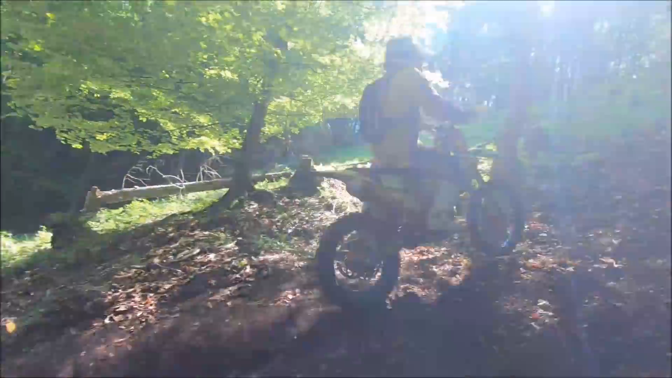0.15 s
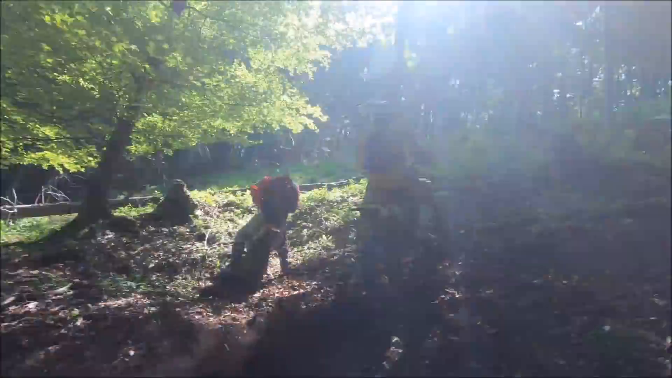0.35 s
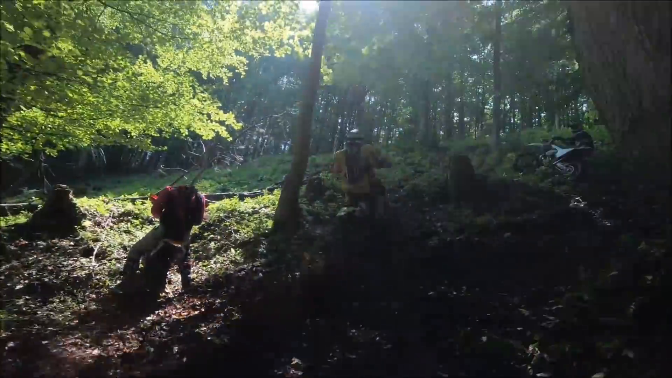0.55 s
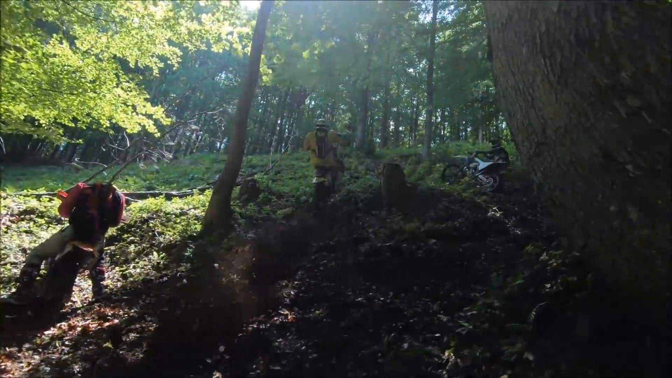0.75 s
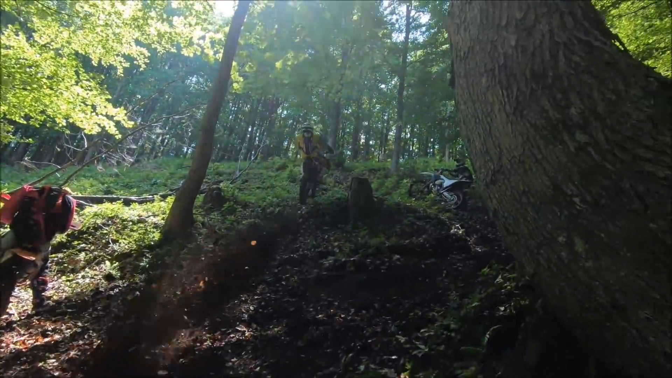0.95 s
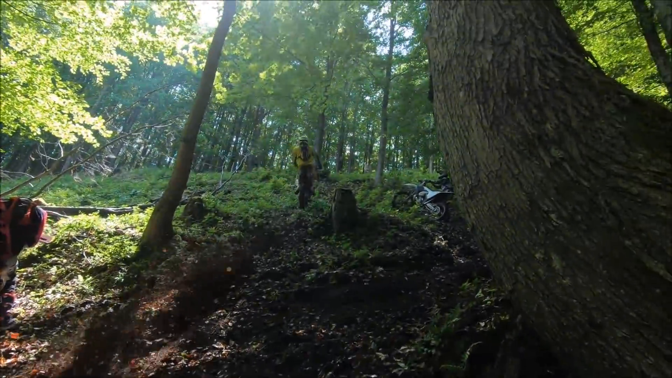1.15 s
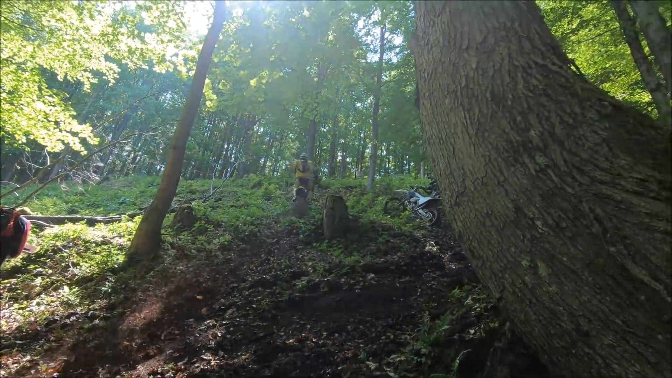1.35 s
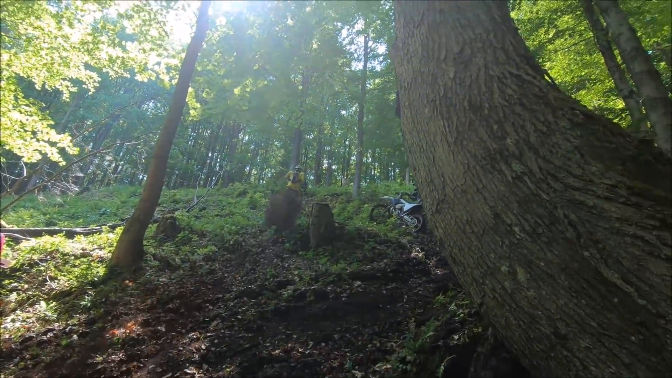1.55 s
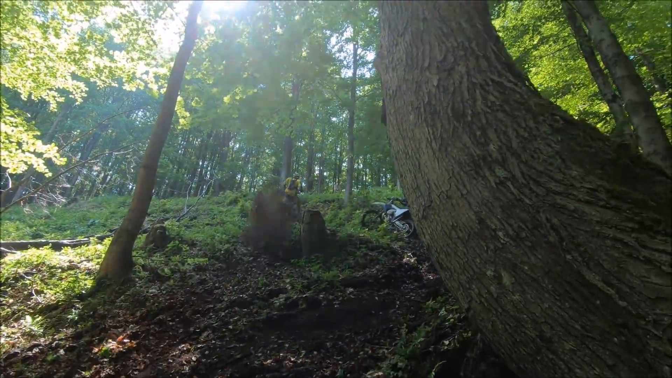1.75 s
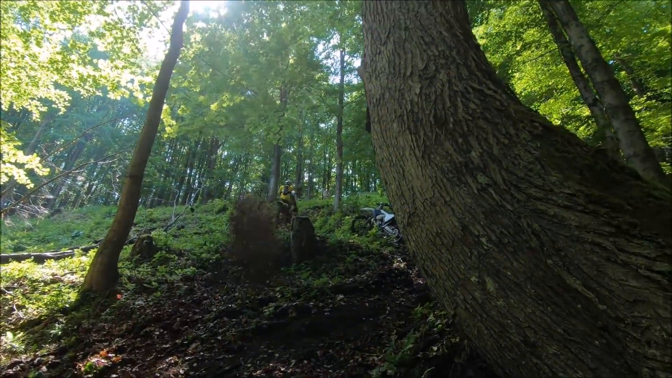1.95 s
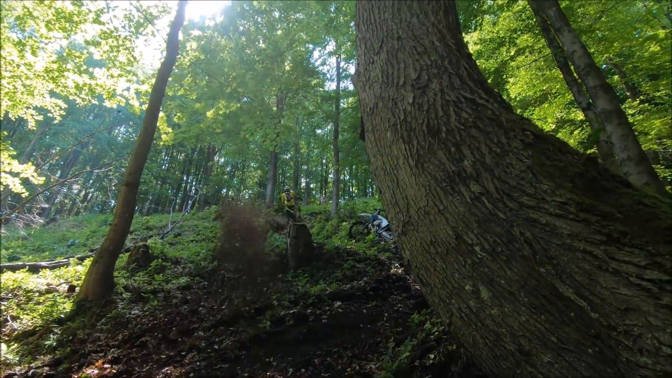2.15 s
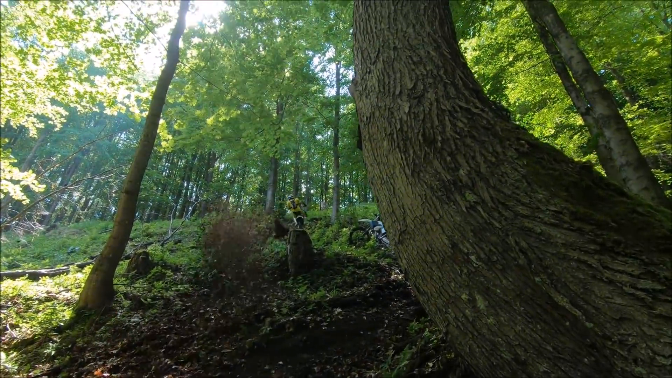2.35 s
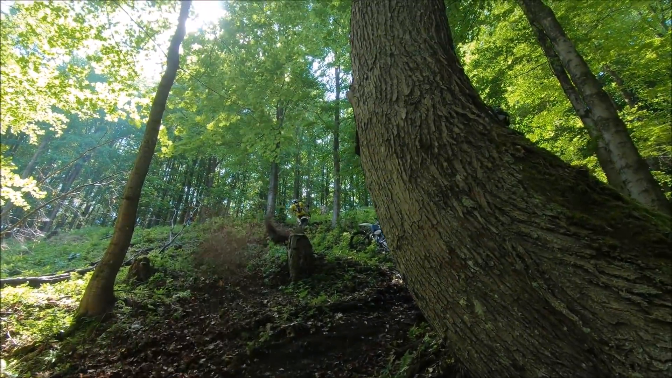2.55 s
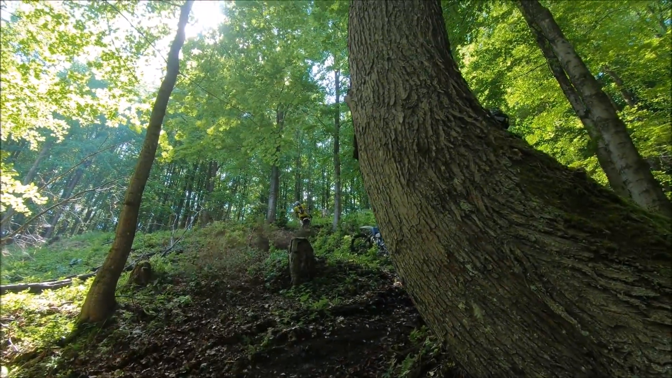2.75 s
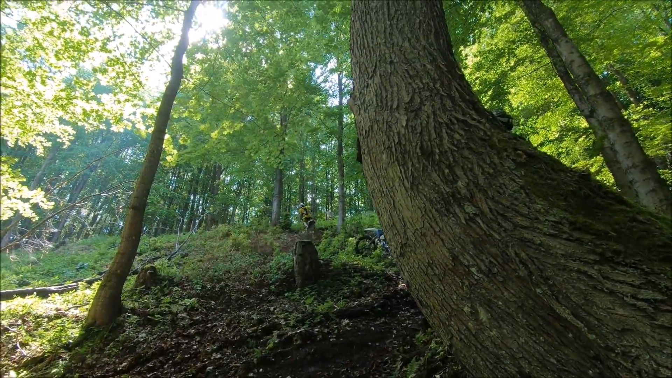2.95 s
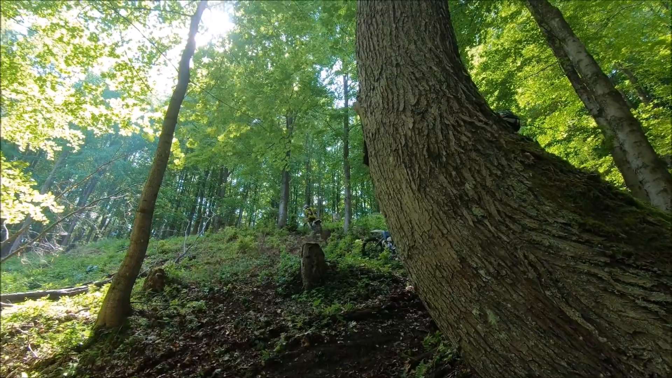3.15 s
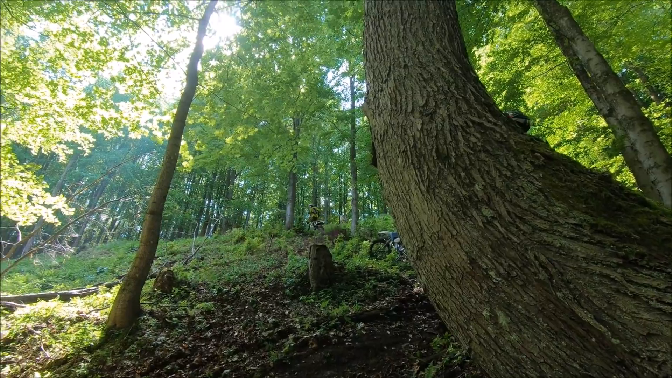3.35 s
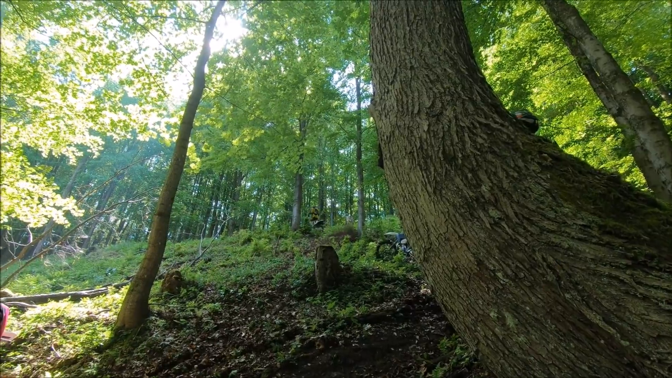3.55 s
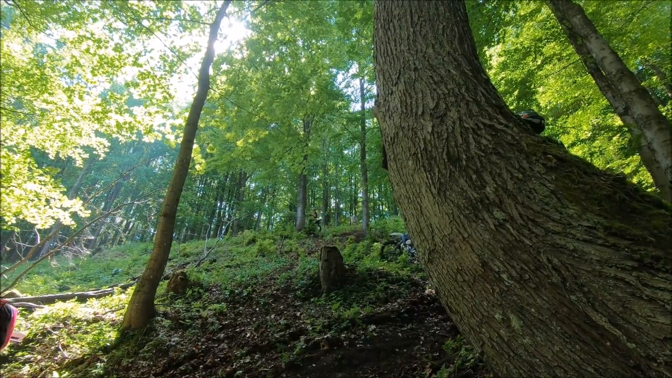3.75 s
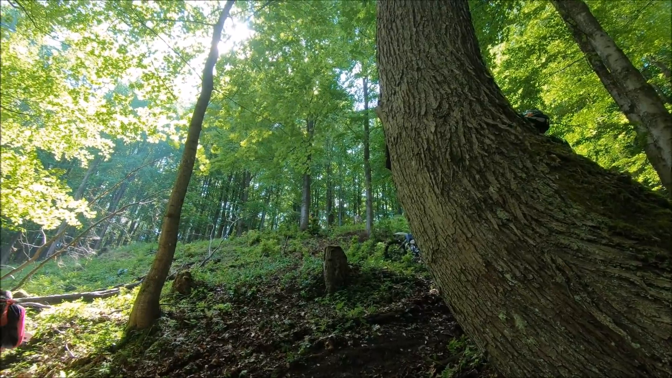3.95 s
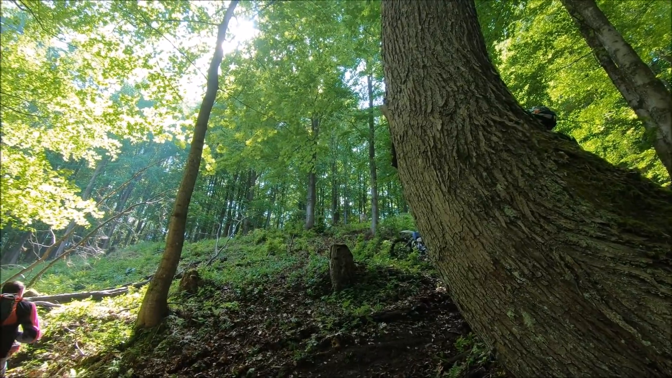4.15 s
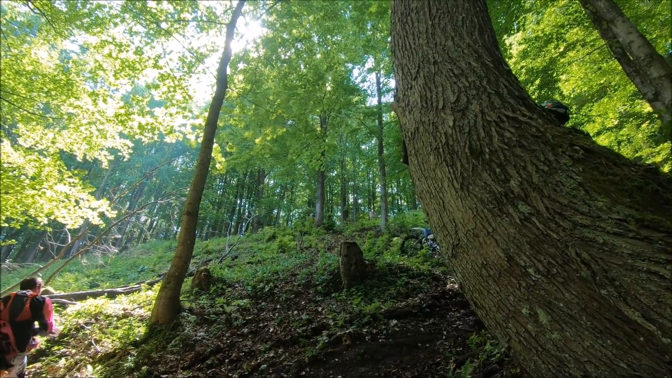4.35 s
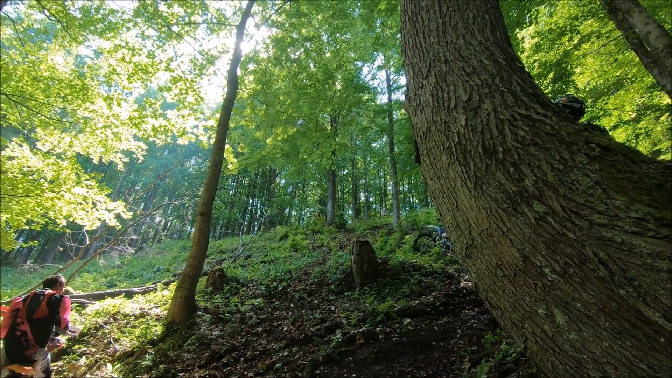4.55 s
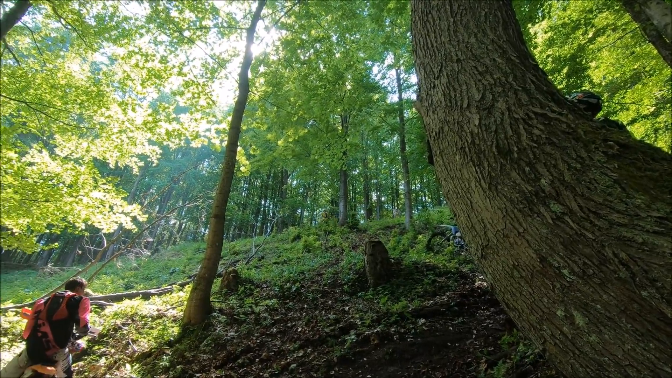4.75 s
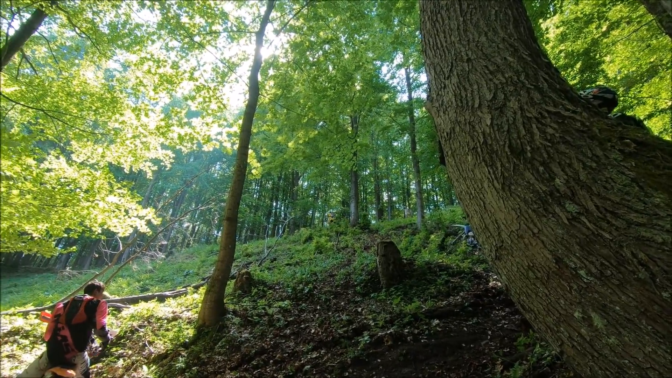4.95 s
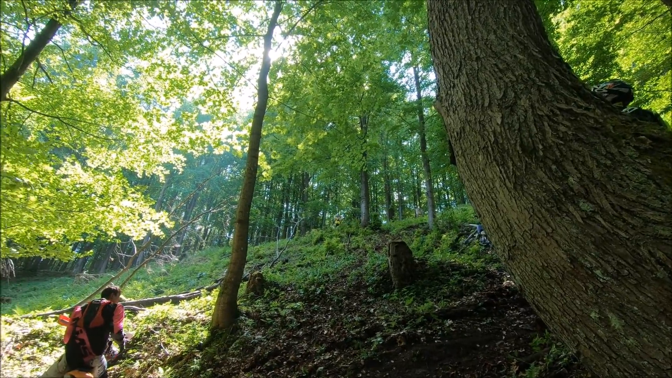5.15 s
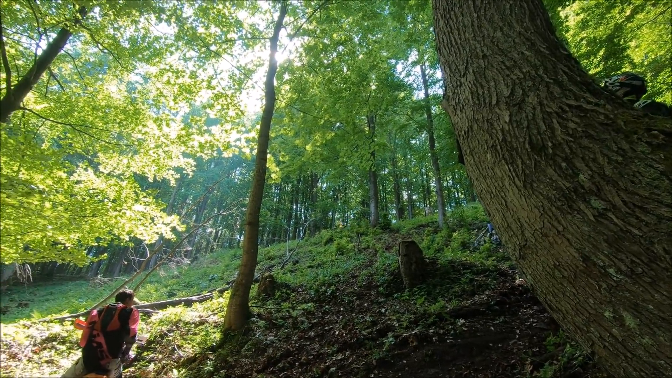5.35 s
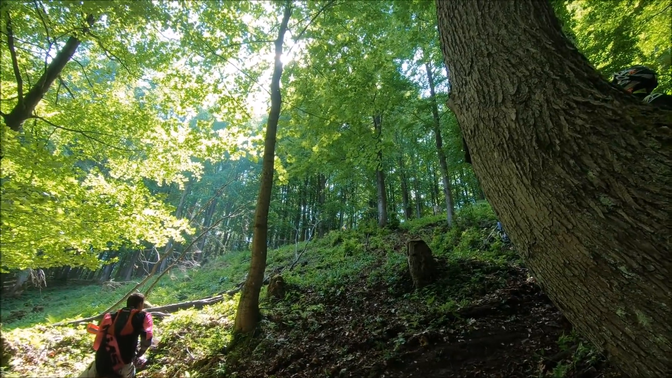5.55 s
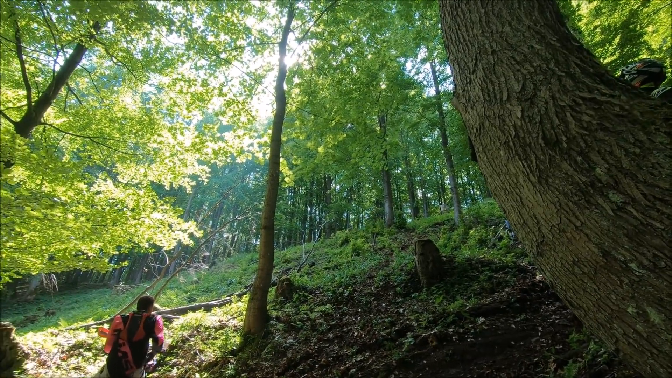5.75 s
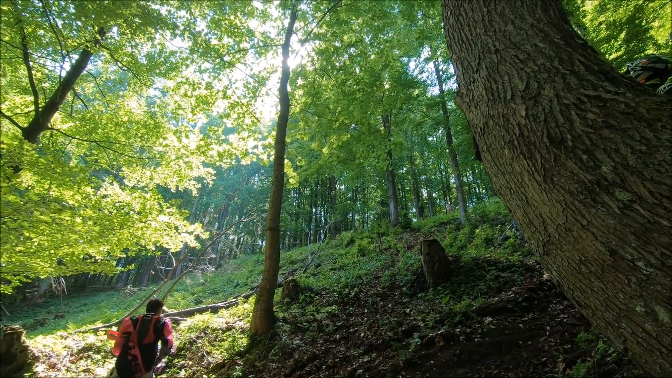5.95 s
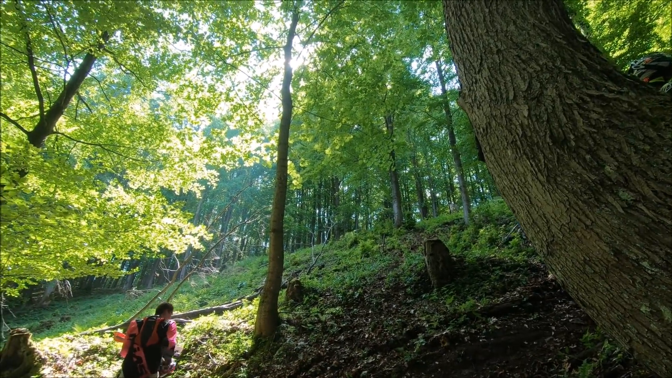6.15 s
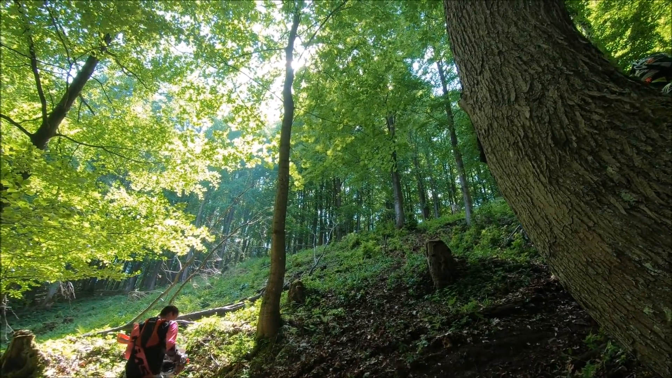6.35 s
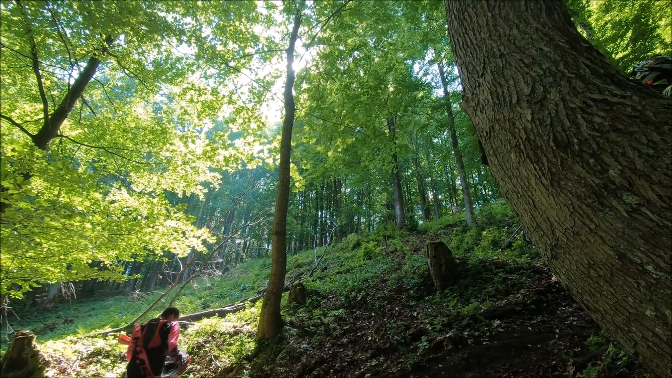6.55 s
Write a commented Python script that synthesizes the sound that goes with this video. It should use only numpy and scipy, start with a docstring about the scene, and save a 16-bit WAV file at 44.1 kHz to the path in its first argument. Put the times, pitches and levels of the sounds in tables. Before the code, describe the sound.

Loud, cracking off-road motorcycle blips climb away through the forest, with one rev-limiter stutter, then fade into slower, duller, echoing bursts and stone clicks.

```python
"""A single-cylinder four-stroke dirt bike passes close by and climbs away up a steep forest slope.
It is heard in bursts of throttle: smooth low waves boom, higher tones bark between the booms' pitches
and the treble, and each firing adds a sharp crack of shaped noise. The rev limiter cuts in once, with bangs.
Hiss comes from chain, tyre and soil, and stones click as ringing grains of noise. Random echo tails
stand for the trees, strongest against weak or fast firings, over the quiet noise of the forest."""
import sys
import numpy as np
from scipy import signal
from scipy.fft import rfft, irfft, next_fast_len
from scipy.io import wavfile
from scipy.ndimage import uniform_filter1d, map_coordinates

SR = 44100
rng = np.random.default_rng(int(sys.argv[2]) if len(sys.argv) > 2 else 0)


def log_audio(samples):
    """Write samples as a 16-bit WAV file to the path given in sys.argv[1]."""
    # one column per channel
    frames = np.atleast_2d(samples).T
    # limit to full scale, then quantise
    limited = np.clip(frames, -1, 1)
    pcm = np.round(limited * 32767).astype(np.int16)
    wavfile.write(sys.argv[1], SR, pcm)


N = 291060
T = np.arange(N) / SR  # time of each sample, s

# twists of the throttle: (opens_s, shuts_s, firings a second at opening_hz and at shutting_hz, roll_off_s,
# boom_db, bark_db, crack_db); the levels are before each layer's final balance
THROTTLE_TWISTS = [(-0.07, 0.125, 70.26, 82.4, 0.29, -15, -19.5, -27.0),
                   (0.19, 0.376, 83.56, 107, 0.22, -14.5, -22, -25.5),
                   (0.49, 0.534, 85.7, 86.45, 0.16, -16, -26.0, -25.5),
                   (0.671, 0.787, 66.6, 67.23, 0.0089, -21, -26.5, -26),
                   (0.909, 1.17, 67.52, 102.7, 0.092, -19, -22.5, -32),
                   (1.191, 1.339, 105.78, 103.9, 0.33, -16, -23, -31.0),
                   (1.447, 1.589, 80.56, 92.88, 0.31, -19.5, -27.5, -33.5),
                   (1.672, 1.786, 83.98, 108.6, 0.19, -19, -28, -31.0),
                   (1.892, 2.015, 85.22, 84.66, 0.03, -19.5, -29.5, -29.5),
                   (2.106, 2.214, 80.34, 92.25, 0.28, -23, -33.0, -32.5),
                   (2.317, 2.515, 67.94, 65.45, 0.25, -27.5, -36, -31.5),
                   (2.616, 2.809, 60.84, 81.0, 0.15, -27.5, -35.5, -41.5),
                   (2.969, 3.07, 56.08, 63.87, 0.28, -24.5, -31, -34.5),
                   (3.242, 3.353, 58.95, 74.44, 0.037, -27.5, -32.5, -35),
                   (3.513, 3.616, 49.58, 65.82, 0.083, -28.0, -36.5, -34),
                   (3.758, 3.871, 52.72, 61.98, 0.095, -31.0, -41, -39.0),
                   (3.986, 4.138, 60.6, 58, 0.077, -31.0, -42, -37),
                   (4.251, 4.351, 53.07, 52.47, 0.42, -29.5, -38, -44),
                   (4.679, 4.776, 38.08, 55.4, 0.12, -31.5, -42.5, -45),
                   (4.951, 5.129, 47.7, 78.17, 0.047, -27, -33.5, -32),
                   (5.235, 5.418, 51.95, 61.53, 0.48, -37, -53, -55),
                   (5.662, 5.805, 46.84, 58.83, 0.061, -29.5, -38, -42),
                   (5.989, 6.061, 47.97, 56.61, 0.14, -32, -43.5, -61),
                   (6.172, 6.252, 35.46, 39.4, 0.051, -32, -40.5, -48.5),
                   (6.428, 6.601, 41.18, 57.1, 0.2, -29.5, -35.5, -42.5)]
# how far the bike is: (time_s, distance_m)
BIKE_DISTANCE = [(0, 8.5), (.7, 6.4), (1.2, 9.9), (2.5, 15.2), (4, 27.9), (6.6, 33)]
# how hard the rev limiter cuts the spark: (time_s, share 0-1)
LIMITER_CUT = [(1.19, 0), (1.205, 0.3), (1.33, 1), (1.36, 0)]
# colour of the hiss and of the very top of the cracks: (pitch_hz, relative_db)
HISS_COLOUR = [(2500, -7.5), (4000, -7), (5000, -11), (6000, -4.5), (6700, -4), (7700, -6.5), (8200, -14.5),
               (9300, -18), (11000, -27), (13000, -28.5), (15800, -36)]
CRUISE_HZ = 59.7  # usual firings a second


def amp(db):
    """Decibels to gain."""
    return 10 ** (np.asarray(db) / 20)


def unit(x):
    """Scale to an average strength (rms) of 1."""
    return x / np.sqrt(np.mean(x ** 2) + 1e-20)


def along(points, hz):
    """Read (pitch_hz, value) points at any pitch, on a log pitch axis."""
    f, v = np.transpose(points)
    return np.interp(np.log(hz + 1), np.log(f + 1), v)


def curves(rows):
    """One value per sample for each column after the time."""
    s, *cols = np.transpose(rows)
    return [np.interp(T, s, c) for c in cols]


def wobble(rate):
    """A smooth random curve through this many random points a second."""
    knots = rng.standard_normal(int(N * rate / SR) + 4)
    return map_coordinates(knots, [T * rate])


def filtered(x, response):
    """Multiply the spectrum of x by a response, which may also shift phase."""
    m = next_fast_len(N + SR // 2)
    hz = np.fft.rfftfreq(m, 1 / SR)
    return irfft(rfft(x, m) * response(hz), m)[..., :N]


def coloured(x, spectrum, size=4096):
    """Give x this spectrum with a filter that never rings ahead of the sound; the result has rms 1."""
    hz = np.fft.rfftfreq(size, 1 / SR)
    # folding the cepstrum forward in time makes the filter minimum-phase
    cepstrum = irfft(np.log(amp(along(spectrum, hz)) + 1e-6))
    cepstrum[1:size // 2] *= 2
    cepstrum[size // 2 + 1:] = 0
    impulse = irfft(np.exp(rfft(cepstrum)))
    return unit(signal.fftconvolve(x, impulse)[:N])


def spread(a, b):
    """Mix two unrelated signals into left and right, as alike at each pitch as the table says."""
    # likeness of the two sides: (pitch_hz, likeness 0-1)
    likeness = [(25, 0.24), (90, 0.83), (400, 0.99), (1000, 1), (2000, 0.59), (4000, 0.91), (7000, 0.056)]
    turn = lambda hz: np.arccos(np.clip(along(likeness, hz), -1, 1)) / 2
    mid = filtered(a, lambda hz: np.cos(turn(hz)))
    side = filtered(b, lambda hz: np.sin(turn(hz)))
    return np.array([mid + side, mid - side])


def revs():
    """Firings a second: they climb ever faster on open throttle, then change fast and level out when shut."""
    pickup_bend, sag_bend = 1.2, 1.5
    rows = np.array(THROTTLE_TWISTS)
    speeds = rows[:, 2:4].ravel()
    steps = np.arange(len(speeds))
    # even steps have the throttle open, odd steps have it shut
    step, part = np.divmod(np.interp(T, rows[:, :2].ravel(), steps), 1)
    bent = np.where(step % 2, 1 - (1 - part) ** sag_bend, part ** pickup_bend)
    return np.interp(step + bent, steps, speeds)


def effort(doublings):
    """Boom, bark and crack levels in dB as twists add power to the coasting engine; last, the load in dB."""
    # with the throttle shut, for boom, bark, crack: (level_db at 10 m, loss_db per doubling of distance)
    shut_levels = [(-37, 1.5), (-50, 2.5), (-51.5, -1.1)]
    # change while the throttle is held: boom, bark, crack [dB per second]
    swells_db_per_s = [9.5, -1, -11.5]
    lead_s, opening_s = 0.049, 0.1  # the throttle starts to open before the revs turn, and takes this long
    coasting = np.array([amp(db - loss_db * doublings) ** 2 for db, loss_db in shut_levels])
    power = coasting.copy()
    for opens, shuts, _, _, roll_off, *levels_db in THROTTLE_TWISTS:
        on = slice(*np.searchsorted(T, [opens - lead_s, shuts + 2]))
        opening = np.clip((T[on] - opens + lead_s) / opening_s, 0, 1)
        gate = opening * np.exp(-np.maximum(T[on] - shuts, 0) / abs(roll_off))
        held = np.clip(T[on], opens, shuts) - opens
        for layer, db, swell_db in zip(power, levels_db, swells_db_per_s):
            layer[on] += (gate * amp(db + swell_db * held)) ** 2
    load_db = 10 * np.log10(power[-1] / coasting[-1])  # the crack's level over coasting
    return (*10 * np.log10(power), load_db)


def boom(turn, rate, level_db, distance):
    """The four lowest orders leave the pipe as smooth waves, coloured by its resonances."""
    # the pipe's colour close by and from afar: (pitch_hz, relative_db)
    near_colour = [(35, -6.5), (60, -8), (85, -6.5), (110, -4.5), (135, 1), (170, -9.5), (215, -14),
                   (265, -1), (300, -2), (340, -16.5), (430, -11.5)]
    far_colour = [(35, -6.5), (60, -6), (85, 0), (110, 5.5), (135, 7), (170, -6), (215, -25.5),
                  (265, -15.5), (330, -26.5), (430, -18)]
    # relative strength of the first four orders [dB]
    orders_db = [3, 2.93, -4, -3]
    even_m = 12.4  # distance at which the two colours weigh the same
    lug_hz, lumpy_db = 39, 3.5  # at this firing rate the waves vary by this much
    pipe_delay_s = .0078
    cut, = curves(LIMITER_CUT)
    phase = 2 * np.pi * (turn - pipe_delay_s * rate)  # the waves trail the crack
    near = 1 / (1 + (distance / even_m) ** 6)
    lumps_db = lumpy_db * (lug_hz / rate) ** 6.0  # stumbling at low revs
    waves = 0
    for k, db in enumerate(orders_db, 1):
        pipe_db = near * along(near_colour, k * rate) + (1 - near) * along(far_colour, k * rate)
        waves = waves + amp(db + pipe_db + lumps_db * wobble(30)) * np.sin(k * phase)
    throb = 1 + 0.72 * cut * np.cos(phase / 4)  # every fourth firing, under the limiter
    return np.sqrt(2) * amp(level_db - 9 * cut) * waves * throb


def bark(turn, rate, level_db, count=26):
    """Higher orders swell where they cross the pipe's resonances, with gas rushing between them."""
    # moving centre of the bark: (time_s, pitch_hz)
    bark_centre = [(0, 344), (.13, 364.6), (.36, 517), (.48, 576), (.62, 740), (.79, 587), (.92, 473),
                   (1.05, 487), (1.32, 710), (1.45, 562), (1.8, 604), (1.95, 546), (2.4, 650), (3.6, 556),
                   (3.9, 889.7), (4.2, 360), (5.1, 460), (5.75, 287.5)]
    # standing waves of the pipe: (pitch_hz, relative_db)
    standing_waves = [(200, 6), (265, 22.5), (340, 11.5), (415, 15), (480, 8.5), (530, 4), (580, 4),
                      (630, 6), (685, 1.5), (735, 11.5), (800, 3), (1400, -1.5)]
    # colour of the rushing gas: (pitch_hz, relative_db)
    gas_colour = [(120, -36.5), (220, -5.5), (400, -1.5), (650, -12), (1000, -13.5), (1600, -18),
                  (4000, -82.5)]
    centre, = curves(bark_centre)
    k = np.arange(5, count)[:, None]  # order: pitch as a multiple of the firing rate
    octaves = np.log2(k * rate / centre)
    # a peak on broad shoulders
    swell = 1 / (1 + (octaves / 0.25) ** 2) + 0.35 / (1 + (octaves / 1.54) ** 4)
    wander_db = 3.0 * np.array([wobble(4.97) for _ in k])
    gain = swell * amp(along(standing_waves, k * rate) + wander_db)
    gain /= np.linalg.norm(gain, axis=0)
    waves = np.sin(2 * np.pi * k * (turn - 0.0004 * rate))
    lines = -np.sqrt(2) * np.sum(gain * waves, axis=0)
    gas = coloured(rng.standard_normal(N) * np.exp(-2.5 * (turn % 1)), gas_colour)
    # the tone breaks up with distance and while the spark is being cut
    far = (curves(BIKE_DISTANCE)[0] / 35) ** 2
    rough = np.clip(far + 0.0087 + 0.34 * curves(LIMITER_CUT)[0], 0, .7)
    return amp(level_db) * (np.sqrt(1 - rough) * lines * amp(0.12 * wobble(50)) + np.sqrt(rough) * gas)


def firings(turn, rate, decay, shock, fresh):
    """Each valve opening sends a steep front and a burst fading over decay s; the limiter leaves a rush."""
    # at low revs ignition comes more unevenly early or late
    turn = turn + .005 * (CRUISE_HZ / rate) ** 2 * wobble(70)
    cycle = turn.astype(int)
    age = (turn % 1) / rate  # seconds since the firing
    size = amp(.7 * rng.standard_normal(1000))[cycle]
    front = unit(-np.diff(cycle, prepend=cycle[0]) * size)
    # the burst changes shape gradually from firing to firing, under some fresh turbulence
    shapes = rng.standard_normal((64, SR // 25))
    shape = map_coordinates(shapes, [T * 9, np.round(age * SR)], order=1)
    turbulence = fresh * rng.standard_normal(N)
    burst = unit(np.exp(-age / decay) * size * (unit(shape) + turbulence))
    cut, = curves(LIMITER_CUT)
    return (1 - cut) * unit(shock * front + burst) + cut * rng.standard_normal(N)


def cracks(turn, rate, level_db, bright):
    """Sharp cracks, duller as the undergrowth takes their bright share, plus a hollow putter."""
    # colour of the crack close by and from afar: (pitch_hz, relative_db)
    near_colour = [(300, -16), (700, 0.5), (1000, 8), (1500, -0.5), (2100, 1.5), (2900, -2), (4000, -2.5),
                   (5000, -12), (6500, -9), (7800, -21), (9000, -34.5), (15000, -35)]
    far_colour = [(300, -29.5), (600, 2.5), (900, -7.5), (1250, 2), (1700, 2.5), (2100, -3), (2800, -9),
                  (3500, -7), (4200, -15.5), (5000, -21.5), (6500, -23), (7800, -21.5), (9000, -50),
                  (15000, -65.5)]
    # putter of part throttle: (time_s, level_db added to the crack's level)
    putter_level = [(0, -24), (2, -12.5), (2.4, -5.5), (3.6, -3.5), (3.95, 5), (4.1, -10.5), (4.25, -21)]
    # colour of the putter: (pitch_hz, relative_db)
    putter_colour = [(450, -35), (750, -7.5), (1050, -3), (1400, -4.5), (2300, -27.5), (5000, -69)]
    pops = firings(turn, rate, decay=0.0022, shock=1.16, fresh=0.54)
    mixed = bright * coloured(pops, near_colour) + (1 - bright) * coloured(pops, far_colour)
    sharp = amp(level_db - 0.58) * unit(mixed)
    soft_pops = firings(turn, rate, decay=0.0013, shock=0.46, fresh=0.28)
    putter = amp(level_db + curves(putter_level)[0]) * coloured(soft_pops, putter_colour)
    return sharp + putter


def spray(patchy_db):
    """Chain, tyre and flying soil hiss as noise of quickly varying strength, partly unlike left and right."""
    grit = [coloured(rng.standard_normal(N) * amp(patchy_db * wobble(900)), HISS_COLOUR) for _ in range(2)]
    return spread(*grit)


def hiss(turn, rate, level_db, scatter, distance):
    """The very top of each crack gives way to steady spray as scatter and distance grow."""
    edge = coloured(firings(turn, rate, decay=0.0023, shock=0.54, fresh=0.22), HISS_COLOUR)
    veil = 1.2 * scatter * np.sqrt(distance)
    return amp(level_db + 0.5) * (edge + veil * spray(patchy_db=-4.1)) / np.sqrt(1 + veil ** 2)


def trees(x, count=22):
    """Diffuse answer of the trunks: overlapping stretches of sound, each with its own fading noise tail."""
    # how long the answer takes to fade by 60 dB: (pitch_hz, fade_s)
    fade_times = [(100, 1), (500, 0.28), (2000, 0.53), (8000, 0.67)]
    wet = np.zeros((2, N + SR))
    hop = N // (count - 1) + 1
    for start in range(-hop, N, hop):
        hz, t, z = signal.stft(rng.standard_normal((2, SR // 2)), SR, nperseg=256)
        fade = amp(-60 * t / along(fade_times, hz)[:, None])
        onset = 1 - np.exp(-t / 0.002)
        tail = signal.istft(z * fade * onset, SR, nperseg=256)[1]
        # average gain of 1 between about 200 Hz and 4 kHz
        tail /= np.sqrt(np.mean(np.abs(rfft(tail)[:, 100:2000]) ** 2))
        i = np.arange(max(start, 0), min(start + 2 * hop, N))
        stretch = x[i] * np.sin(np.pi * (i - start) / (2 * hop))
        part = signal.fftconvolve(stretch[None], tail, axes=1)
        wet[:, i[0]:i[0] + part.shape[1]] += part
    return spread(*wet[:, :N])


def forest_quiet():
    """The quiet of the forest: steady, mostly low noise on both sides."""
    # colour of the quiet: (pitch_hz, relative_db)
    quiet_colour = [(20, 8.5), (40, -15), (100, 0), (250, -9.5), (500, -15), (1000, -26), (3000, -29.5),
                    (5000, -41.5), (7000, -28.5), (9000, -51), (15000, -78)]
    return amp(-36.0) * spread(*[coloured(rng.standard_normal(N), quiet_colour) for _ in range(2)])


def stones():
    """Stones thrown by the tyre: dry clicks with a brief, noisy ring."""
    # each stone: (start_s, level_db before a common 6 dB cut, ring pitch_hz)
    stone_hits = [(.868, -46, 13600), (2.136, -47, 9100), (2.954, -26, 5800), (3.562, -47, 7150),
                  (3.845, -36, 6500), (5.303, -35.5, 8100), (5.329, -48.5, 7850)]
    out = np.zeros(N)
    t = np.arange(SR // 20) / SR
    for s, db, hz in stone_hits:
        grain = unit(uniform_filter1d(rng.standard_normal(len(t)), size=14))
        ring = grain * np.sin(2 * np.pi * hz * t) * amp(-60 * t / 0.026)
        out[round(s * SR):][:len(t)] += amp(db - 6.0) * ring
    return out


def bangs():
    """Unburnt fuel bangs in the pipe: fading puffs of noise while the spark is being cut."""
    # each bang: (start_s, level_db before colouring)
    bang_hits = [(1.2224, -21), (1.261, -19.5), (1.3, -21.5), (1.3286, -22)]
    colour = [(200, 4), (900, 9.0), (3500, 8.5), (6500, 0), (10000, -25.5)]  # (pitch_hz, gain_db)
    puffs = sum(amp(db) * (T >= s) * np.exp(-np.abs(T - s) / 0.0009) for s, db in bang_hits)
    return filtered(puffs * rng.standard_normal(N), lambda hz: amp(along(colour, hz)))


def scene():
    """The exhaust, direct and scattered by the trees, with hiss and clicks over the quiet of the forest."""
    rate = revs()
    turn = np.cumsum(rate) / SR + .3  # firings so far
    distance = np.abs(curves(BIKE_DISTANCE)[0])
    doublings = np.log2(distance / 10)  # of distance, from 10 m
    octaves = np.log2(rate / CRUISE_HZ)  # doublings of revs
    boom_db, bark_db, crack_db, load_db = effort(doublings)
    # the hiss follows part of the load, and gains per doubling of distance and of revs
    hiss_db = -56 + 0.6 * load_db + 0.5 * doublings + 7.5 * octaves
    # scattered over direct: hard, slow firings stand clear of the trees; weak or fast ones merge with them
    scatter = amp(7 - 0.73 * load_db + 9 * octaves)
    direct = 1 / np.sqrt(1 + scatter ** 2)
    # undergrowth dulls the cracks as the bike gets away; the bright share halves at 9.2 m
    bright = np.clip(0.76 / (1 + (distance / 9.2) ** 2), 0, 1)
    low = boom(turn, rate, boom_db, distance)
    growl = bark(turn, rate, bark_db - .7)
    crack = cracks(turn, rate, crack_db, bright)
    top = hiss(turn, rate, hiss_db, scatter, distance)
    clicks = stones() + bangs()
    # long waves pass the trunks, short ones bounce between them
    bounced = scatter * direct * (crack + amp(-3.5) * growl)
    bounced_low = amp(-11.5) * (1 - bright) * low
    echo = trees(bounced + bounced_low + amp(-8.5) * clicks)
    return low + growl + direct * crack + top + clicks + echo + forest_quiet()


def record(dry):
    """The two microphone ports differ in level and phase; nothing passes above the band limit."""
    # level between the ports: (pitch_hz, left minus right_db)
    port_tilt = [(60, -1.5), (100, -1.5), (180, -3.5), (310, -3.5), (530, -9.5), (920, -4.5), (1590, 0.5),
                 (2750, 0.0), (4740, -1), (8190, -1.0)]
    # phase between the ports: (pitch_hz, left port's lead in radians)
    port_lead = [(450, 0.047), (850, 1.14), (1150, 1.37), (2000, 0.69), (3000, 0.5), (4500, 0.42)]
    top_hz = 15800
    half = lambda hz: amp(along(port_tilt, hz) / 2) * np.exp(1j * along(port_lead, hz) / 2)
    return filtered(dry, lambda hz: np.array([half(hz), 1 / half(hz)]) * (hz < top_hz))


dry = scene()
out = record(dry)
log_audio(out)
```